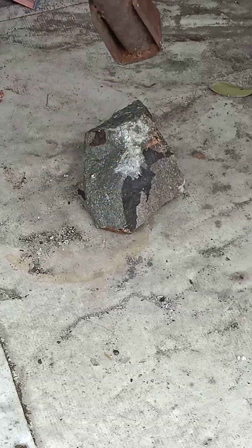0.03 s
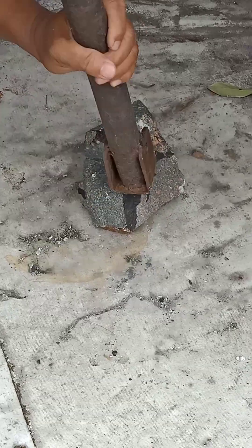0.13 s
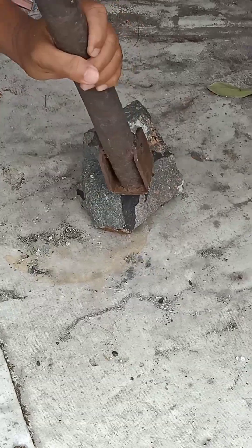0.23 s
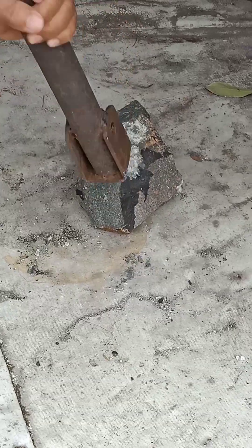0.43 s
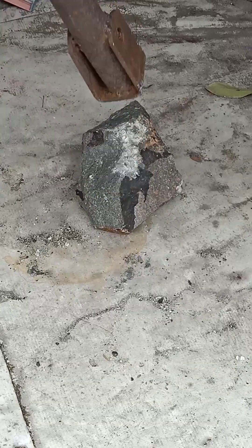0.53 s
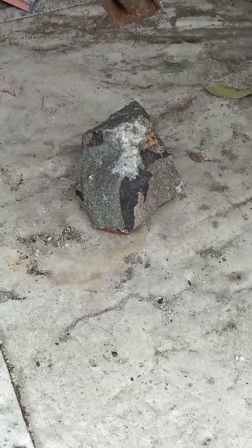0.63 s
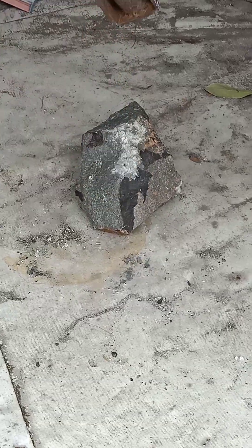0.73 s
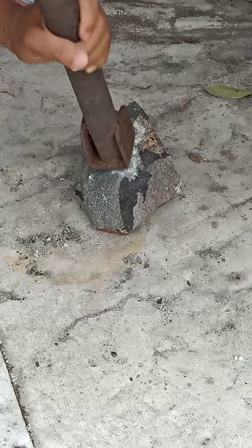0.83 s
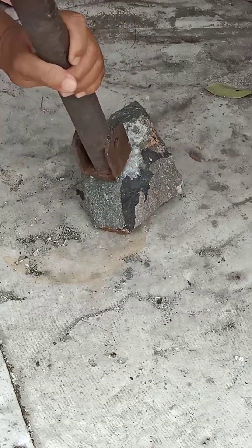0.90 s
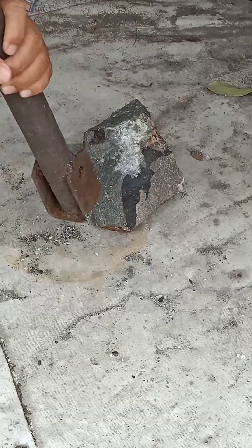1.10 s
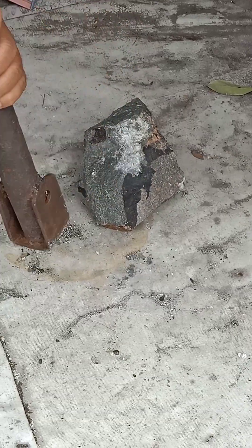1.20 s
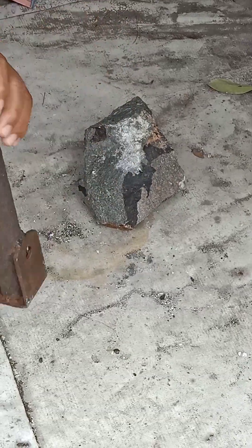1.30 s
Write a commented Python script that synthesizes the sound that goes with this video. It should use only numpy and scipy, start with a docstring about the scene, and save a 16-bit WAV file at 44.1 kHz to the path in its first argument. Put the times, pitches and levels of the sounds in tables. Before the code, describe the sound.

Two loud, dry metal-on-stone clinks about seven tenths of a second apart, the second slightly softer and lower, with faint rock thuds, grit ticks and a final light floor scrape, heard close in a quiet yard.

```python
"""A hand-held rusty steel tube is struck twice on a rock lying on concrete, close by.
Each blow sums short knock modes, a noise crack and longer tube modes; decaying noise makes the yard's answer.
The rock settles in damped wavelet thuds, with faint grit ticks; the tube's foot scrapes the floor as dense grains.
A faint high ring (one decaying sine), distant outdoor rush and low rumble (shaped noise) lie under it."""
import sys
import numpy as np
from scipy import signal
from scipy.fft import rfft, irfft, next_fast_len
from scipy.io import wavfile
from scipy.ndimage import uniform_filter1d, minimum_filter1d

SR = 44100
rng = np.random.default_rng(int(sys.argv[2]) if len(sys.argv) > 2 else 0)


def decibels_to_gain(level_db):
    """Convert a level in decibels to a linear amplitude gain (20 dB per decade)."""
    exponent = np.asarray(level_db, float) / 20
    return 10 ** exponent


def dump(signal):
    """Clip the signal to [-1, 1] and save it as 16-bit WAV at the path in sys.argv[1]."""
    limited = np.clip(np.atleast_2d(signal).T, -1, 1)
    pcm = np.round(limited * 32767).astype(np.int16)
    wavfile.write(sys.argv[1], SR, pcm)


N = 59535

# blows: (time [s], strength [dB], grip damping [factor], left-right [dB], left lead [ms])
BLOWS = [(.2305, -5.5, 1.287, 0.5, 0.086), (.958, -9.5, 0.88, 0, 0.089)]
CONTACT_S = 0.00093  # force build-up
TOUCH_LEAD_S, TOUCH_DB = 0.0015, -32.5  # light touch before the blow
# knock of rock, flange and floor: (frequency [Hz], first spot [dB], second spot [dB], t60 [s])
KNOCK_MODES = [(125, -19, -29, 0.072), (220.8, -11, -2.5, 0.088), (316, -11.5, -16, .05),
               (497, -7, 0.5, 0.069), (725, -9.5, -18.5, 0.044), (975, -5.5, -4.5, 0.042),
               (1234, -5.5, -6.5, 0.043), (1600, -13, -3.5, 0.028), (1758, 4.5, 3.5, 0.028),
               (2176, 3.5, 5, 0.049), (2430, 10.5, 0.5, 0.021), (3692, -13, -12, 0.044),
               (4976, -18, -17.5, 0.028), (5490, -20.5, -19.5, 0.023), (6630, 1.5, -42, .008),
               (7520, -12.5, -31, 0.017)]
# the knock is loud while steel presses on stone, then drops
PRESS_S, PRESS_CYCLES, AFTER_PRESS_DB = 0.0031, 0.6, -12
SWING_IN_CYCLES = 0.21
# crack spectrum: (frequency [Hz], relative density [dB per Hz])
CRACK_SPECTRUM = [(1500, -17.5), (2500, -10.5), (3600, -7), (5400, -10.5), (7000, -10.5), (9800, -29.5),
                  (12500, -27.5), (16400, -40)]
CRACK_DB, CRACK_T60_S = -13.5, 0.02
# tube modes, close pairs beat: (frequency [Hz])
TUBE_HZ = [3043.5, 3036, 3655, 4174, 4160, 4855, 5227, 5410, 7063, 7800, 9356, 10360, 10900, 11500, 12030,
           12800, 13600, 14900]
# same modes in order: (first spot [dB], second spot [dB], t60 before grip damping [s])
TUBE_MODES = [(-13.5, -18, .33), (-36, -30, 1.1), (-39.5, -28, 0.08), (-22, -38.5, 0.19),
              (-43.5, -56, 0.73), (-44, -29, 0.086), (-44.5, -42, 0.24), (-42, -36, .1),
              (-47.5, -60, 0.095), (-49.5, -32.5, 0.099), (-47, -63, .15), (-43, -60, 0.11),
              (-61, -60, 0.12), (-40.5, -69, .12), (-53.5, -49.5, .15), (-53.5, -57.5, .08),
              (-46, -55, 0.085), (-48, -49, .08)]
SET_DOWN_S, SET_DOWN_T60_S = 1.226, 0.19  # extra ring damping once the foot touches the floor

# near-wall decay: (frequency [Hz], t60 [s])
YARD_NEAR_T60 = [(100, .25), (400, 0.26), (1200, 0.11), (2500, 0.11), (5000, 0.11), (12000, .06)]
# yard colour: (frequency [Hz], level [dB])
YARD_TONE = [(100, -1.5), (400, -3), (1200, -0.5), (2500, -8.5), (4500, 7.5), (7000, -19), (12000, -16)]
YARD_DB, FAR_DB, FAR_T60_S = -11, -32.5, 1.6
YARD_ALIKE = 0.35  # left-right likeness

# rock settling: (time [s], envelope peak before the ports [dB], frequency [Hz])
THUDS = [(.435, -48.5, 200), (.492, -54, 180), (.510, -44, 374), (.532, -45.5, 220), (.541, -68, 200),
         (.561, -48, 407), (.602, -49, 150), (.638, -58, 150), (.773, -54, 200), (1.218, -51.5, 180),
         (1.322, -40, 130)]
# grit ticks: (time [s], envelope peak before the ports [dB], frequency [Hz])
TICKS = [(.123, -55.5, 2220), (.403, -58, 2340), (.416, -48.5, 2270), (.466, -59, 1290), (.788, -55, 2670)]
ROCK_LEAD_MS, FOOT_LAG_MS = 0.1, 0.484  # left port against right

# foot on concrete: (start [s], length [s], rms before envelope and ports [dB], tilt [dB per octave])
SCRAPES = [(1.2546, .008, -42, -1.5), (1.262, 0.016, -44.5, 2.8), (1.3038, 0.041, -39.5, -1.5)]
# foot and floor colour: (frequency [Hz], relative density [dB per Hz])
SCRAPE_SPECTRUM = [(250, -19), (500, -5.5), (900, 5.5), (1300, -2), (1500, -10), (1900, -3.5), (2500, -7),
                   (3300, -17), (6000, -26), (8000, -37), (13000, -39), (16000, -52)]
GRIT_PER_S, GRIT_SPREAD_DB = 4000, 2.5  # mean rate; half the range of grain levels
SCRAPE_RISE_S, SCRAPE_FALL_S = 0.001, 0.018

FAINT_RING_HZ, FAINT_RING_DB, FAINT_RING_T60_S = 3400, -70, 0.6

# rush level: (time [s], rms [dB])
RUSH_LEVEL = [(0, -62.5), (.22, -63.5), (.4, -58), (.7, -59.5), (.95, -59), (1.15, -59), (1.35, -48)]
# rush colour: (frequency [Hz], relative density [dB per Hz])
RUSH_SPECTRUM = [(150, -14.5), (250, -3), (430, -4.5), (900, -7), (1300, -5), (1450, -8), (1700, -7.5),
                 (2400, -2.5), (3100, -11), (3600, -20), (5900, -14), (7300, -32), (11600, -40),
                 (16000, -39)]
# rush coherence: (frequency [Hz], left-right likeness [-1 to 1])
RUSH_ALIKE = [(60, 0.31), (180, 0.98), (550, 0.48), (1650, 0.33), (4970, 0.1), (15000, 0.18)]
# rumble level: (time [s], rms [dB])
RUMBLE_LEVEL = [(0, -67), (.2, -63), (.45, -57), (.6, -57.5), (.9, -60.5), (1.1, -60), (1.35, -56.5)]
# rumble colour: (frequency [Hz], relative density [dB per Hz])
RUMBLE_SPECTRUM = [(20, -26), (40, -9.5), (70, -3.5), (115, 3), (150, -7), (250, -17.5), (400, -31),
                   (800, -84.5)]
# rumble coherence: (frequency [Hz], left-right likeness [-1 to 1])
RUMBLE_ALIKE = [(40, .4), (120, .9), (300, 0.36)]
# lean of rush and rumble: (frequency [Hz], left-right [dB])
NOISE_LEAN = [(60, -6), (180, 0.5), (550, -0.5), (1650, -4.5), (4970, 0), (15000, -4.5)]

# unequal microphone ports: (frequency [Hz], left-right [dB])
PORT_COLOUR = [(60, 1), (130, 2.5), (300, -4.5), (600, 1.5), (1400, 8), (2300, 4), (3040, 1), (4200, -1),
               (6000, -7.5), (9000, -1.5), (13000, -9.5)]
# port phase: (frequency [Hz], extra left lead [rad])
PORT_TURN = [(40, 0.83), (130, 0.57), (300, 0.054), (700, 0.62), (1400, -0.2), (3200, -0.73), (4000, -0.39),
             (5200, -2.12), (7000, 0.13), (12000, 0.028)]
MIC_LOW_HZ = 68
LIMIT_TOP, LIMIT_S = 1, 0.00032

TIME_S = np.arange(N) / SR


def unit(x):
    """Scale to rms 1."""
    return x / np.sqrt(np.mean(x ** 2) + 1e-20)


def along(points, hz):
    """Interpolate (Hz, value) points on a log-frequency axis."""
    f, v = np.transpose(points)
    return np.interp(np.log(hz + 1), np.log(f + 1), v)


def filtered(x, response):
    """Multiply the spectrum of x by response(hz)."""
    size = next_fast_len(x.shape[-1] + 8192)
    spectrum = rfft(x, size) * response(np.fft.rfftfreq(size, 1 / SR))
    return irfft(spectrum, size)[..., :x.shape[-1]]


def placed(x, pan_db, lead_ms):
    """Mono to two ports: level lean, port colour, left lead and port phase."""
    side = np.array([[0.5], [-0.5]])

    def ports(hz):
        lean_db = pan_db + along(PORT_COLOUR, hz)
        turn_rad = 2 * np.pi * hz * lead_ms / 1000 + along(PORT_TURN, hz)
        return decibels_to_gain(side * lean_db) * np.exp(1j * side * turn_rad)

    return filtered(x, ports)


def blows():
    """Contact force builds up, exciting knock, crack and ring; the yard answers knock and crack."""
    out = np.zeros((2, N))
    for spot, (start_s, db, grip, pan_db, lead_ms) in enumerate(BLOWS):
        t = np.maximum(TIME_S - start_s, 0)
        rise = 1 - np.exp(-(t / CONTACT_S) ** 2)
        impact = rise * (knock(t, spot) + crack(t))
        touch = decibels_to_gain(TOUCH_DB) * np.roll(impact, -round(TOUCH_LEAD_S * SR))
        impact = decibels_to_gain(db) * (impact + touch)
        ringing = decibels_to_gain(db) * rise * ring(t, spot, grip)
        out += placed(impact + ringing, pan_db, lead_ms) + yard(impact)
    return out


def knock(t, spot):
    """Damped modes of rock, flange and floor; each swings in, then drops as the press ends."""
    out = np.zeros(N)
    for k, mode in enumerate(KNOCK_MODES):
        hz, t60_s = mode[0], mode[3]
        press_s = PRESS_S + PRESS_CYCLES / hz
        released = 1 - np.exp(-(t / press_s) ** 4)
        swing_in = 1 - np.exp(-t * hz / SWING_IN_CYCLES)
        level = decibels_to_gain(mode[1 + spot] - 60 * t / t60_s + AFTER_PRESS_DB * released)
        sign = (-1) ** k  # alternate modes start inverted
        out += sign * level * swing_in * np.sin(2 * np.pi * hz * t)
    return out


def crack(t):
    """Broadband noise burst with exponential decay."""
    noise = filtered(rng.standard_normal(N), lambda hz: decibels_to_gain(along(CRACK_SPECTRUM, hz)))
    return unit(noise) * decibels_to_gain(CRACK_DB - 60 * t / CRACK_T60_S)


def ring(t, spot, grip):
    """Tube modes decaying at a rate scaled by the grip, damped further at set-down."""
    out = np.zeros(N)
    for hz, mode in zip(TUBE_HZ, TUBE_MODES):
        out += decibels_to_gain(mode[spot] - 60 * grip * t / mode[2]) * np.sin(2 * np.pi * hz * t)
    return out * decibels_to_gain(-60 * np.maximum(TIME_S - SET_DOWN_S, 0) / SET_DOWN_T60_S)


def yard(x):
    """Near walls answer quickly, each frequency at its own decay; far ones leave a long faint wash."""
    hz, t, z = signal.stft(rng.standard_normal((3, SR)), SR, nperseg=128)
    near = decibels_to_gain(-60 * t / along(YARD_NEAR_T60, hz)[:, None])
    far = decibels_to_gain(FAR_DB - 60 * t / FAR_T60_S)
    fade = decibels_to_gain(along(YARD_TONE, hz)[:, None]) * (near + far)
    tail = signal.istft(z * fade, SR, nperseg=128)[1]
    pair = np.sqrt(YARD_ALIKE) * tail[0] + np.sqrt(1 - YARD_ALIKE) * tail[1:]
    pair = pair / np.linalg.norm(pair[0])
    return decibels_to_gain(YARD_DB) * signal.fftconvolve(x[None], pair, axes=1)[:, :N]


def wavelets(rows, cycles):
    """Sines under a u*exp(-u) envelope peaking after the given cycles."""
    out = np.zeros(N)
    for start_s, db, hz in rows:
        phase = np.maximum(TIME_S - start_s, 0) * hz
        envelope = phase / cycles * np.exp(1 - phase / cycles)
        out += decibels_to_gain(db) * envelope * np.sin(2 * np.pi * phase)
    return out


def thuds():
    """Rocking rock: heavily damped low wavelets."""
    return wavelets(THUDS, cycles=0.26)


def ticks():
    """Grit: higher wavelets lasting more cycles."""
    return wavelets(TICKS, cycles=3.4)


def scrapes():
    """Dense uneven grit grains under each stroke, through the colour of foot and floor."""
    out = np.zeros(N)
    for start_s, length_s, db, tilt_db in SCRAPES:
        chance, sign, strength = rng.random((3, N))
        grains = (chance < GRIT_PER_S / SR) * np.sign(sign - 0.5) * decibels_to_gain(2 * GRIT_SPREAD_DB * strength)

        def colour(hz):
            return decibels_to_gain(along(SCRAPE_SPECTRUM, hz) + tilt_db * np.log2((hz + 1) / 1000))

        rise = np.clip((TIME_S - start_s) / SCRAPE_RISE_S, 0, 1)
        fall = np.exp(-np.maximum(TIME_S - start_s - length_s / 2, 0) / SCRAPE_FALL_S)
        out += decibels_to_gain(db) * rise * fall * unit(filtered(grains, colour))
    return out


def faint_ring():
    """Faint high ring dying away from the start."""
    level = decibels_to_gain(FAINT_RING_DB - 60 * TIME_S / FAINT_RING_T60_S)
    return level * np.sin(2 * np.pi * FAINT_RING_HZ * TIME_S)


def distant_noise(level, spectrum, alike, patchy_db):
    """Patchy shaped noise; the mid/side balance sets the likeness of the ports."""
    z = signal.stft(rng.standard_normal((2, N + 512)), nperseg=512)[2]
    field = uniform_filter1d(rng.standard_normal(z.shape[1:]), size=6, axis=0)
    field = uniform_filter1d(field, size=8, axis=1)
    pair = signal.istft(z * decibels_to_gain(patchy_db * unit(field)), nperseg=512)[1][:, :N]

    def mid_side(hz):
        turn_rad = np.arccos(np.clip(along(alike, hz), -1, 1)) / 2
        return decibels_to_gain(along(spectrum, hz)) * [np.cos(turn_rad), np.sin(turn_rad)]

    mid, side = filtered(pair, mid_side)
    both = np.array([mid + side, mid - side])
    both = filtered(both, lambda hz: decibels_to_gain(np.outer([0.5, -0.5], along(NOISE_LEAN, hz))))
    return unit(both) * decibels_to_gain(np.interp(TIME_S, *np.transpose(level)))


def rush():
    """Distant outdoor noise, uneven in time and frequency."""
    return distant_noise(RUSH_LEVEL, RUSH_SPECTRUM, RUSH_ALIKE, patchy_db=2.0)


def rumble():
    """Low noise without patches."""
    return distant_noise(RUMBLE_LEVEL, RUMBLE_SPECTRUM, RUMBLE_ALIKE, patchy_db=0)


def scene():
    """All sources at the two ports."""
    small = placed(thuds() + ticks() + faint_ring(), pan_db=-15, lead_ms=ROCK_LEAD_MS)
    foot = placed(scrapes(), pan_db=2.0, lead_ms=-FOOT_LAG_MS)
    return blows() + small + foot + rush() + rumble()


def low_pass(x):
    """Removes everything above the highest recorded frequency."""
    return signal.sosfilt(signal.butter(12, 16530, fs=SR, output="sos"), x)


def record(dry):
    """The microphone drops the deep bass; a fast limiter holds the loudest peaks."""
    mic = filtered(dry, lambda hz: (1j * hz / (MIC_LOW_HZ + 1j * hz)) ** 2)
    span = round(LIMIT_S * SR)
    needed = LIMIT_TOP / np.maximum(np.abs(mic), LIMIT_TOP)
    held = minimum_filter1d(needed, 2 * span + 1, axis=1)
    gain = uniform_filter1d(uniform_filter1d(held, span, axis=1), span, axis=1)
    return low_pass(mic * gain)


dry = scene()
out = record(dry)
dump(out)
```